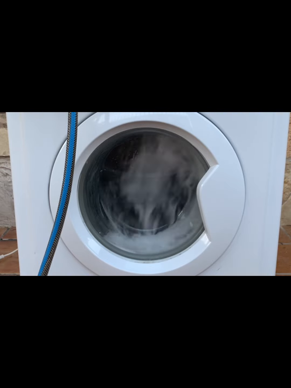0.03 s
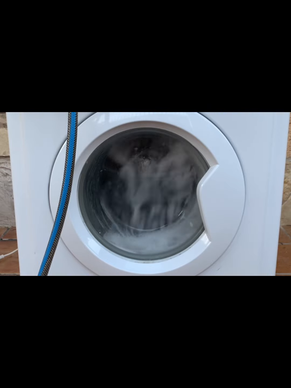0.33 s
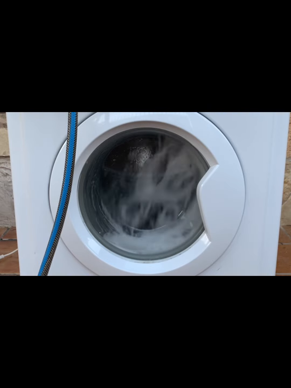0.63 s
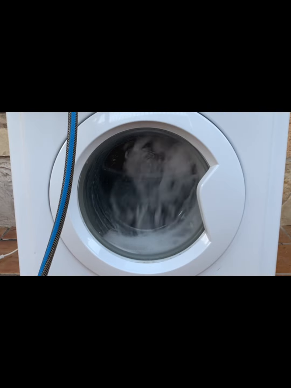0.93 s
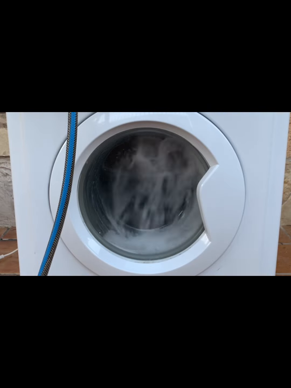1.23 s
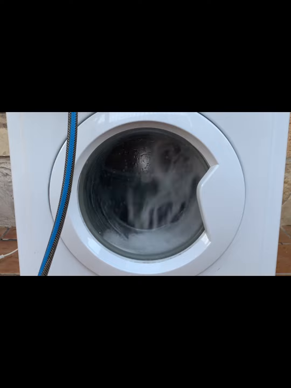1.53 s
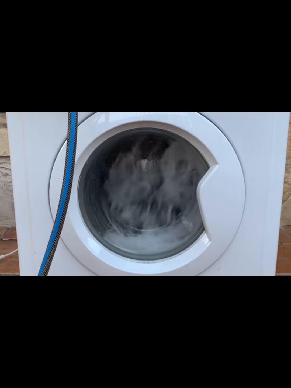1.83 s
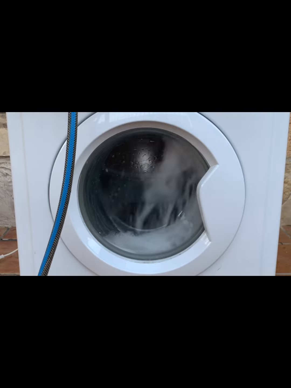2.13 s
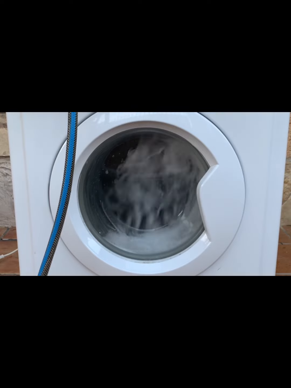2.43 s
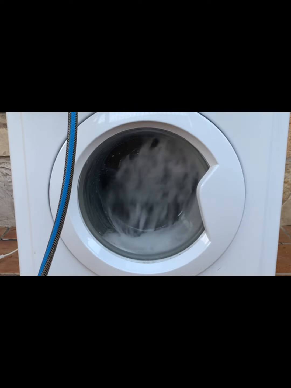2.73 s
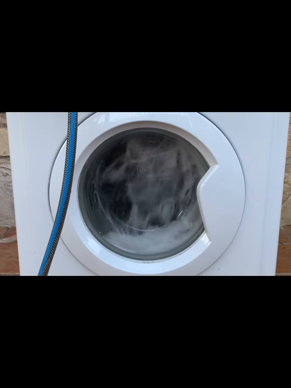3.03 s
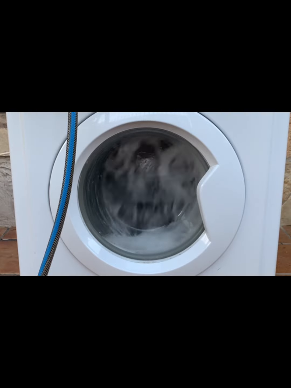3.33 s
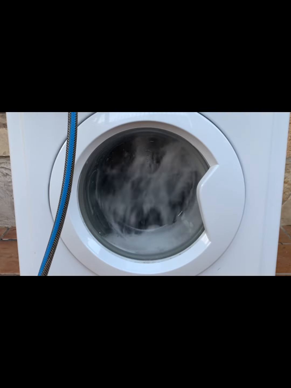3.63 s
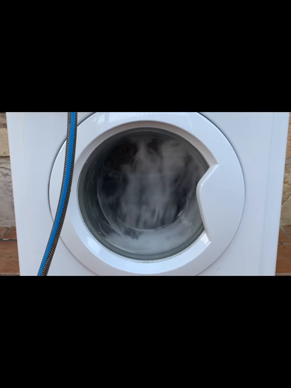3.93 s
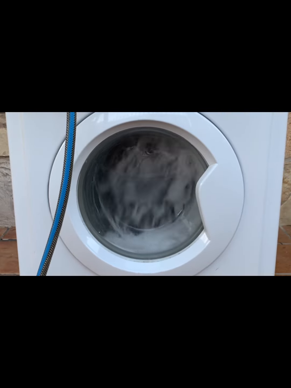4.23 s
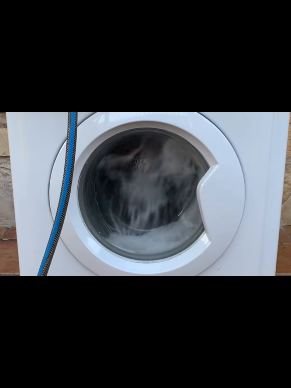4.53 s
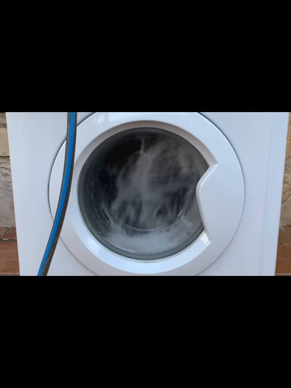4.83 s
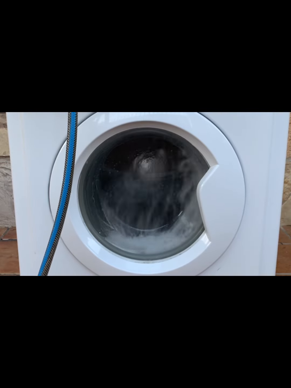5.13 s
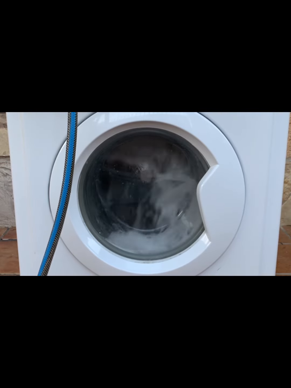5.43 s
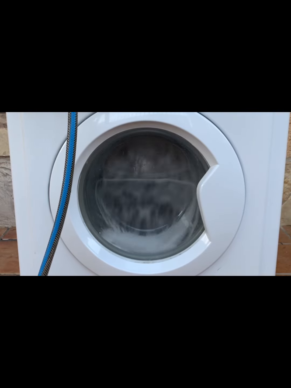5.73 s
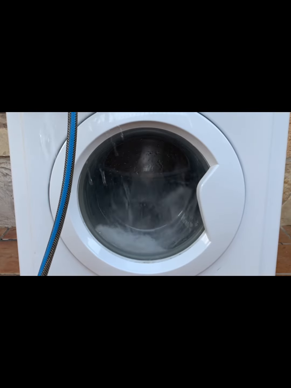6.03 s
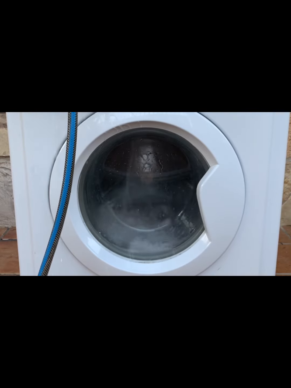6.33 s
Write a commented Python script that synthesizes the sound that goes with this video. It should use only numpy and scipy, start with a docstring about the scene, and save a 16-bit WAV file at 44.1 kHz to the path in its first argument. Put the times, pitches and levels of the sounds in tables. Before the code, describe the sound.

A washing machine drum whirls sudsy water outdoors, heard from just in front of its door. Rumbling, churning and irregular dull booms run under a thin, slightly wavering motor whine and a bright hiss. Water starts slapping the glass, then the motor stops abruptly and the rumble fades. Quieter sloshing, glugs, small splashes and sharp drips follow as the water settles.

```python
"""Outdoors, just in front of a front-loading washing machine that whirls a drum of sudsy water.
The brush motor whines and hisses in step with the mains while water drums on the tub. Then the power
cuts: the drum coasts to rest, the water falls back with a slosh, trapped air gurgles, and splashes
and drops hit the door glass."""
import sys
import numpy as np
from scipy import signal
from scipy.fft import rfft, irfft
from scipy.io import wavfile
from scipy.ndimage import uniform_filter1d, map_coordinates

SR = 44100
rng = np.random.default_rng(int(sys.argv[2]) if len(sys.argv) > 2 else 0)


def store_pcm(level_fs):
    """Save levels as 16-bit WAV."""
    pcm = np.round(np.clip(level_fs, -1, 1) * 32767).astype(np.int16)
    wavfile.write(sys.argv[1], SR, np.atleast_2d(pcm).T)


N = 285768
T = np.arange(N) / SR
FREQS = np.arange(N // 2 + 1) * SR / N
MAINS_HZ, POWER_OFF_S, COAST_S = 50, 4.728, 0.75
SINCE_CUT_S = np.maximum(T - POWER_OFF_S, 0)
DRUM_SPEED = np.maximum(1 - SINCE_CUT_S / COAST_S, 0)  # 1 under power, then friction slows it evenly

# Levels in the tables are faders within their own layer.
# tub and cabinet resonances: (pitch [Hz], width [Hz], level [dB])
TUB_MODES = [(76.3, 9.9, -7.5), (100, 7.8, -15.5), (135, 15.4, -2.5), (148.1, 6.6, 2), (183.3, 20.4, -0.5),
             (248.5, 19, -12), (303.2, 22, -2), (341, 34, -16), (422, 29.5, -9.5)]
# resonances of the air in the drum: (pitch [Hz], width [Hz], level [dB])
DRUM_AIR_MODES = [(350, 100, -2.5), (853, 140, 2), (1295, 170, 2), (1700, 210, -2.5)]
# waves collapsing in the drum: (time [s], rumble [dB], water [dB], attack [s], hold [s], decay [s])
WAVES = [(4.768, -31, -29, 0.019, 0.0093, 0.027), (5.224, -27.5, -37, 0.0058, 0.011, 0.049),
         (5.356, -31.5, -67, 0.019, .02, 0.087), (5.752, -36, -56, 0.024, 0.041, 0.099),
         (5.85, -34, -48, 0.034, 0.038, 0.053), (5.916, -37.5, -39.5, 0.019, 0.11, 0.055),
         (6.104, -35.5, -49.5, 0.087, 0.09, 0.072)]
# tone of the low rumble, the churn and the slosh: (frequency [Hz], level [dB])
RUMBLE_EQ = [(15, -44), (35, -49), (60, 0.5), (130, -1.5), (330, 0), (480, -10.5), (800, -24.5),
             (2000, -57)]
CHURN_EQ = [(250, -13.5), (450, -0.5), (565, 3.5), (620, 1), (750, 4), (920, -3.5), (1250, -4),
            (1520, -8.5), (1850, -4), (2500, -12), (3500, -16.5), (5200, -20), (9000, -31), (16000, -44)]
SLOSH_EQ = [(100, -13), (350, 5), (1800, -1.5), (3000, 1), (6000, -10), (16000, -28)]
# the whine, sagging and singing louder under load: (time [s], loudest partial [Hz], level [dB])
WHINE_CURVE = [(0, 2045, -36), (.1, 2034, -38), (.29, 2050, -37), (.35, 2045, -42), (.39, 2036, -37),
               (.7, 2032, -37.5), (1.0, 2029, -34), (1.16, 2026, -33.5), (1.22, 2040, -38.5),
               (1.3, 2033, -35), (1.36, 2034, -38), (1.83, 2030, -37), (2.27, 2036, -39),
               (2.34, 2036, -36.5), (2.46, 2035, -38), (3.15, 2034, -38.5), (3.52, 2019, -34.5),
               (4.72, 2019, -34.5)]
# whine partials: (slot harmonic, sideband [steps of twice the mains], level [dB], heavy-load trim [dB])
WHINE_PARTIALS = [(1, 1, -1, 0), (1, 0, -9.5, -11.5), (1, -1, -22, 5), (2, 0, -18, -11), (2, -1, -23, -9),
                  (2, 1, -31, 0), (2, 2, -24, -3)]
# tone of the brush scrape: (frequency [Hz], level [dB])
BRUSH_EQ = [(1500, -50), (3500, -3), (5400, -6.5), (6700, -2), (7700, 0.5), (8600, -9.5), (10100, 3.5),
            (10800, -3), (12000, -3.5), (13900, -6.5), (14900, -9.5), (15700, -8.5)]
# brush holder resonances: (pitch [Hz], width [Hz], level [dB])
HOLDER_MODES = [(6550, 14, 7.5), (7280, 30, -3.5), (7790, 33, 6), (10169, 27, -0.5),
                (10600, 20, -3), (10740, 19, 8.5), (11260, 40, 5)]
# lumps of water landing in the tub: (time [s], level [dB], pitch [Hz])
THUDS = [(0.266, -18.5, 170), (0.76, -20, 137.7), (0.91, -20.5, 137), (1.17, -19, 148), (1.29, -25, 140),
         (1.508, -19, 183.6), (2.306, -20, 145.8), (3.256, -19.5, 335), (3.306, -20, 350),
         (3.65, -20, 132.3), (4.29, -37, 45), (4.622, -19.5, 143.2), (4.791, -20, 178.4),
         (5.15, -25.5, 174), (5.231, -26, 173), (5.25, -34, 77.4), (5.862, -31, 135), (5.896, -28.5, 215),
         (6.24, -31, 240), (6.083, -28.5, 151), (6.27, -34, 68), (6.343, -29, 199.7)]
# splashes on the door: (time [s], slap [dB], spray [dB], mist [dB], decay [s])
SPLASHES = [(3.1712, -25, -42, -55, 0.027), (3.4997, -23, -42, -55, 0.04), (3.8442, -21.5, -50, -55, 0.035),
            (4.3146, -31, -38.5, -50, 0.035), (4.725, -28, -33.5, -41, 0.022),
            (4.777, -19.5, -51, -55, 0.065), (5.015, -21.5, -38, -45, 0.054),
            (5.233, -39, -37.5, -32.5, 0.042), (5.362, -29, -44, -61, 0.053), (5.829, -55, -44, -58, 0.046),
            (6.032, -30, -42.5, -50, 0.047), (6.289, -37.5, -38, -57, 0.05), (6.4278, -40, -42, -50, 0.072)]
# tone of the three splash layers: (frequency [Hz], level [dB])
SLAP_EQ = [(500, -13), (1600, 5.5), (2400, 5.5), (3500, 4), (6000, -6), (10000, -9), (16000, -35)]
SPRAY_EQ = [(1500, -9), (4000, -0.5), (5500, -3), (7500, 2), (10000, 1), (12500, -4), (16000, -9)]
MIST_EQ = [(4000, -35), (7500, -16), (9500, 1), (11500, 2), (15500, -4)]
# drops on the door: (time [s], level [dB], centre [Hz])
DROPS = [(5.2346, -8, 11000), (5.8433, -21.5, 7900), (5.864, -35, 1900), (6.0337, -30, 2400),
         (6.049, -24, 10500), (6.072, -31, 3400), (6.082, -18, 9300), (6.2876, -13, 5340),
         (6.2892, -16, 3900), (6.3043, -20, 10200), (6.353, -27, 11900), (6.4236, -14.5, 7630),
         (6.428, -26, 4200), (6.441, -27, 7000), (6.452, -30, 2800), (6.464, -27, 2700), (6.477, -30, 5000)]
# clouds of bubbles: (time [s], length [s], lowest pitch [Hz], highest pitch [Hz], level [dB])
BUBBLE_CLOUDS = [(4.774, .045, 1890, 2900, -36), (4.778, .045, 400, 1500, -33),
                 (5.362, .1, 2020, 3420, -50), (5.361, 0.11, 296, 610, -39.5), (5.871, 0.07, 219, 750, -42),
                 (5.938, .13, 1050, 2000, -50), (6.063, .04, 226, 424, -36.5),
                 (6.232, 0.049, 260, 472, -37.5)]
# single large bubbles: (time [s], level [dB], starting pitch [Hz], decay [s])
GLUGS = [(5.642, -41, 1750, .004), (5.691, -41, 1800, .004), (5.863, -37, 1650, 0.0033),
         (5.893, -37, 820, .012), (5.909, -39.5, 2480, .007), (5.925, -25, 350, 0.01),
         (5.931, -26, 1190, 0.012), (5.945, -35, 1620, 0.0205), (5.956, -35, 670, .012),
         (6.004, -32, 720, 0.009), (6.014, -35, 1100, .012), (6.029, -29, 790, 0.0096),
         (6.043, -34, 1720, 0.0097), (6.063, -36.5, 1180, 0.0099), (6.158, -43, 750, 0.019),
         (6.242, -37, 1130, 0.013)]
# suds bursting on the glass: (time [s], level [dB], decay [s])
FIZZES = [(4.779, -43, .03), (5.361, -36, 0.048)]
# tone of the suds: (frequency [Hz], level [dB])
SUDS_EQ = [(1500, -30), (2050, -5), (2600, 2), (3400, -7), (4800, -13), (9000, -35)]
# low motor tones: (pitch [Hz], level [dB])
HUM_TONES = [(148.3, -41), (301, -45), (565, -51.5), (751, -54.5)]
# motor squeaks: (time [s], hold [s], pitch [Hz], width [Hz], level [dB])
SQUEAKS = [(0.342, .03, 3990, 30, -49), (4.731, .005, 3780, 220, -40), (5.108, .05, 3780, 160, -62),
           (5.127, 0.06, 1997, 50, -52)]
# resonances of the air over the pool: (pitch [Hz], width [Hz], level [dB])
POOL_MODES = [(817, 27, 0.5), (1220, 62, 0), (1350, 54, -3), (1623, 30, -10)]
# stereo balance: (frequency [Hz], left minus right [dB])
STEREO_BALANCE = [(60, 7.5), (110, 2.5), (160, -1), (350, 0), (600, 6), (1300, 4.5), (2050, 7.5), (2600, 3),
                  (3900, 4), (5200, -0.5), (16000, 0.5)]
# stereo phase: (frequency [Hz], lead of the left side [rad])
STEREO_PHASE = [(0, 0), (300, -.08), (1000, .2), (2050, .7), (4500, .6), (6500, -.3), (8500, -3.14),
                (10900, -6.28), (13400, -9.42), (16000, -12.6)]
# tone of the reflections: (frequency [Hz], level [dB])
SCATTER_EQ = [(60, -21), (250, -18.5), (600, -5.5), (1500, -2), (4500, 14.5), (7000, -8), (16000, -103)]


def drum():
    """Water drums on the tub and churns; once the drum rests it falls back and rings the air inside."""
    rumble_waves = water_waves = 0
    for start, rumble_db, water_db, attack, hold, decay in WAVES:
        swell = burst(start, attack, decay, hold)
        rumble_waves += undb(rumble_db) * swell
        water_waves += undb(water_db) * swell
    # the beds fade from the power cut on; the rumble keeps a low floor
    rumble_bed = np.hypot(undb(-29 - 14.5 * SINCE_CUT_S + 0.63 * walk(14)), undb(-42.5))
    water_bed = undb(-36.5 - 15.5 * SINCE_CUT_S)
    turning = np.interp(DRUM_SPEED, [0, 1], [.3, 1])
    tub = waver(ring(TUB_MODES, 900, 2.65), depth=0.01484, rate=9)
    tub = unit(signal.sosfilt(signal.butter(2, [55, 520], "band", fs=SR, output="sos"), tub))
    pelting = colour(patter(1500, 3.2), RUMBLE_EQ)
    rumble = unit(tub * turning + undb(-9) * pelting * (2 - turning))
    churn = colour(patter(7000, 3.07) * undb(1.2 * walk(35)), CHURN_EQ)
    drum_air = waver(ring(DRUM_AIR_MODES, 1200, 2.5), depth=.05, rate=25)
    slosh = colour(drum_air, SLOSH_EQ)
    fallen = np.interp(T, [5.8, 5.93], [.05, .92])  # crossfade from churn to slosh
    water = undb(1.5) * np.sqrt(1 - fallen) * churn + undb(2.5) * np.sqrt(fallen) * slosh
    return np.hypot(rumble_bed, rumble_waves) * rumble + np.hypot(water_bed, water_waves) * water


def motor_whine(tug_sag_hz=2.5, tug_db=.9, flutter_depth=.11):
    """Rotor slots sing; the chopped mains current adds sidebands, and all stop when the power cuts."""
    pitch_hz, db = curves(WHINE_CURVE)
    tug = walk(24)  # the tumbling load pulls the pitch down and the level up
    slot_hz = pitch_hz - 2 * MAINS_HZ - tug_sag_hz * tug
    slot_phase = 2 * np.pi * np.cumsum(slot_hz) / SR
    heavy_load = np.interp(T, [3.3, 3.7], [0, 1])
    out = 0
    for harmonic, sideband, partial_db, load_db in WHINE_PARTIALS:
        phase = harmonic * slot_phase + sideband * 4 * np.pi * MAINS_HZ * T + 2 * np.pi * rng.random()
        flutter = 1 + flutter_depth * harmonic * (walk(55) + 1j * walk(55))  # in level and phase
        out += undb(partial_db + load_db * heavy_load) * np.imag(flutter * np.exp(1j * phase))
    return np.sqrt(2) * out * undb(db + tug_db * tug) * np.exp(-SINCE_CUT_S / 0.0099)


def brushes(ease_db_per_s=0.56, hush_db=-73):
    """Carbon brushes scrape and spark, pulsing with the mains; unpowered they rub, fading with speed."""
    mains_phase = 2 * np.pi * MAINS_HZ * T
    powered = T < POWER_OFF_S
    pulsing = 1 + powered * (0.14 * np.cos(2 * mains_phase) + 0.12 * np.cos(mains_phase))
    scrape = colour(patter(25000, 1.8) * pulsing, BRUSH_EQ)
    holders = ring(HOLDER_MODES, 9000, 1)
    running = undb(-40.5 - ease_db_per_s * T)
    coasting = undb(-48.5) * np.sqrt(DRUM_SPEED) + undb(hush_db)
    return (scrape + undb(-7.5) * holders) * np.where(powered, running, coasting) * undb(.5 * walk(16))


def thuds(attack_cycles=1.1, decay_cycles=2.2):
    """Heavy lumps of water make the tub boom for a few cycles."""
    out = np.zeros(N)
    for start, db, hz in THUDS:
        envelope = burst(start, attack_cycles / hz, decay_cycles / hz)
        out += undb(db) * envelope * np.sin(2 * np.pi * (hz * T + rng.random()))
    return out


def splashes():
    """Sheets of water slap the door, break into spray and mist, then trickle down the glass."""
    slap = spray = mist = 0
    for start, slap_db, spray_db, mist_db, decay in SPLASHES:
        slap += undb(slap_db) * burst(start - .004, 0.0043, decay)
        spray += undb(spray_db) * burst(start - .002, 0.0021, decay)
        mist += undb(mist_db) * burst(start, 0.003, decay)
    mist *= colour(patter(9000, 3.2), MIST_EQ)
    runoff = burst(start=5.88, attack=0.055, decay=0.035, hold=0.38)
    trickle = runoff * undb(-50 + 3.4 * walk(50)) * colour(patter(5000, 6.6), SPRAY_EQ)
    slap *= undb(-11.5) * colour(patter(5600, 4.3), SLAP_EQ)
    spray *= undb(3) * colour(patter(6000, 4.5), SPRAY_EQ)
    return slap + spray + mist + trickle


def drops():
    """Single drops snap against the door, each a millisecond of thin ringing."""
    out = np.zeros(N)
    for start, db, hz in DROPS:
        impact = burst(start + 0.00036, 0.00081, 0.00078) * rng.standard_normal(N)
        snap = resonate(resonate(impact, hz, hz * 0.75), hz, hz)
        snap = signal.sosfilt(signal.butter(2, hz, "high", fs=SR, output="sos"), snap)
        out += undb(db) * snap / np.abs(snap).max()
    return out


def gurgles(bubbles=48, decay_cycles=8.4, glide=0.08):
    """Air trapped by falling water rings as clouds of up-gliding bubbles, thickest at the start."""
    out = np.zeros(N)
    age = np.arange(SR // 6) / SR
    for start, length, low_hz, high_hz, db in BUBBLE_CLOUDS:
        cloud = np.zeros(N)
        for when, height, strength in rng.random((bubbles, 3)):
            hz = low_hz * (high_hz / low_hz) ** height
            life = age * hz / decay_cycles
            phase = 2 * np.pi * np.cumsum(hz * (1 + glide * np.tanh(life / 2))) / SR
            bubble = strength ** 2 * (1 - when / 2) * np.exp(-life) * np.sin(phase)
            onset = min(int((start + when ** 2 * length) * SR), N - 1)
            cloud[onset:onset + len(age)] += bubble[:N - onset]
        out += undb(db) * unit(cloud) * np.sqrt(length * SR / N)
    return out


def glugs(glide=0.132):
    """Single large bubbles break away and ring, rising in pitch as they near the surface."""
    out = np.zeros(N)
    for start, db, hz, decay in GLUGS:
        pitch_hz = hz * (1 + glide * np.tanh(np.maximum(T - start, 0) / (2 * decay)))
        envelope = burst(start, 0.43 * decay, decay)
        out += undb(db) * envelope * np.sin(2 * np.pi * np.cumsum(pitch_hz) / SR)
    return out


def suds_fizz():
    """Suds thrown against the glass burst in a wash of tiny bubbles."""
    envelope = sum(undb(db) * burst(start, .005, decay) for start, db, decay in FIZZES)
    return envelope * colour(patter(9000, 2.8), SUDS_EQ)


def motor_hum():
    """The running motor shakes the cabinet in a few unsteady low tones."""
    tones = 0
    for hz, db in HUM_TONES:
        level = undb(db + 3.2 * walk(9.8))
        pitch_hz = hz + 3.01 * walk(12)
        tones += level * np.sin(2 * np.pi * np.cumsum(pitch_hz) / SR)
    return np.sqrt(2) * tones * np.exp(-SINCE_CUT_S / 0.13)


def motor_squeaks():
    """The motor squeaks briefly, a rough narrow tone, as it runs, cuts out and coasts."""
    out = np.zeros(N)
    for start, hold, hz, width, db in SQUEAKS:
        tone = unit(resonate(resonate(rng.standard_normal(N), hz, width), hz, width))
        out += undb(db) * burst(start, .006, 0.019, hold) * tone
    return out


def settling_pool():
    """Water streams off the load into the pool and keeps the air above it ringing."""
    flow = burst(start=6.02, attack=0.13, decay=0.14, hold=0.088)
    return undb(-47) * flow * waver(ring(POOL_MODES, 160, 2.9), depth=0.0117, rate=20)


def stereo(x, scatter_db):
    """Sound arrives left and right, both direct and scattered by cabinet, wall and paving."""
    echoes = rng.standard_normal((2, N)) * burst(0.0024, 0.00063, 0.0093)
    echoes = rfft(echoes / np.sqrt(np.sum(echoes ** 2, axis=1, keepdims=True)))
    send = undb(eq_curve(SCATTER_EQ) + scatter_db)
    lead = np.interp(FREQS, *np.transpose(STEREO_PHASE))
    sides = np.array([[.5], [-.5]])
    paths = np.exp(1j * sides * lead) + send * echoes
    paths /= np.sqrt(np.mean(np.abs(paths) ** 2, axis=0))  # scatter only moves energy between sides
    balance = undb(sides * eq_curve(STEREO_BALANCE))
    response = np.fft.fftshift(irfft(paths * balance, N), axes=1)
    return signal.fftconvolve(x[None], response, axes=1)[:, N // 2:N // 2 + N]


def ring(modes, rate, spread_db):
    """Tiny impacts pelt a body and keep each of its resonances ringing."""
    return unit(sum(undb(db) * resonate(unit(patter(rate, spread_db)), hz, width)
                    for hz, width, db in modes))


def patter(rate, spread_db):
    """Random tiny impacts of uneven size, `rate` a second."""
    sizes = undb(spread_db * np.minimum(rng.exponential(size=N), 4))
    return (rng.random(N) < rate / SR) * rng.choice([-1, 1], N) * sizes


def waver(x, depth, rate):
    """Shifting water detunes all resonances together, by about `depth` as a share of their pitch."""
    position = np.arange(N) + np.cumsum(depth * walk(rate))
    return unit(map_coordinates(x, [position], order=3, mode="mirror"))


def burst(start, attack, decay, hold=0):
    """An envelope that climbs to 1, may hold there, and dies away; times in seconds."""
    age = T - start
    return np.clip(age / attack, 0, 1) * np.exp(-np.clip((age - attack - hold) / decay, 0, 20))


def walk(rate):
    """Smooth random modulation of spread near 1, with `rate` changes a second."""
    count = int(SR / rate)
    steps = np.repeat(rng.standard_normal(N // count + 1), count)[:N]
    return 1.337 * uniform_filter1d(uniform_filter1d(steps, count), count)


def resonate(x, hz, width):
    """One resonance, gain 1 at its centre."""
    return signal.lfilter(*signal.iirpeak(min(hz, .45 * SR), hz / min(width, .4 * SR), fs=SR), x)


def colour(x, eq):
    """Shape the tone with an EQ table; rms 1."""
    return unit(irfft(rfft(x) * undb(eq_curve(eq)), N))


def eq_curve(eq):
    """An EQ table in dB at every frequency, joined on a log axis."""
    hz, db = np.transpose(eq)
    return np.interp(np.log(FREQS + 1), np.log(hz), db)


def curves(table):
    """Automation: each column of a timed table at every sample."""
    times, *columns = np.transpose(table)
    return [np.interp(T, times, column) for column in columns]


def undb(db):
    """Decibels to gain."""
    return 10 ** (np.asarray(db) / 20)


def unit(x):
    """Scale to rms 1."""
    return x / np.sqrt(np.mean(x ** 2))


def scene():
    """Drum, brushes and splashes spread over three spots; motor tones and drops sit dry and close."""
    spread = sum(stereo(drum() + brushes() + splashes(), scatter_db=2) for _ in range(3)) / np.sqrt(3)
    direct = stereo(motor_whine() + motor_squeaks() + motor_hum() + drops(), scatter_db=-22)
    water = stereo(thuds() + gurgles() + glugs() + settling_pool() + suds_fizz(), scatter_db=-2)
    return spread + direct + water


def record(dry, top_hz=15800):
    """A steep low-pass trims the very top of the mix."""
    return signal.sosfilt(signal.ellip(10, .2, 70, top_hz, fs=SR, output="sos"), dry)


dry = scene()
out = record(dry)
store_pcm(out)
```